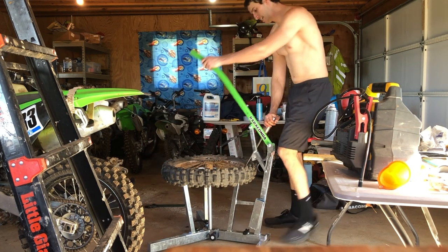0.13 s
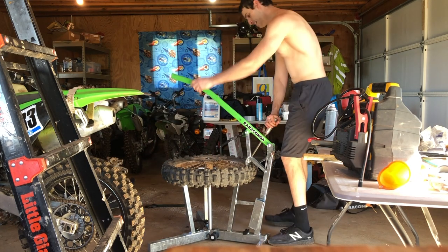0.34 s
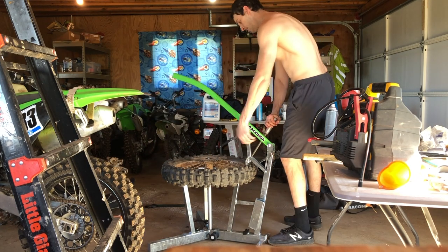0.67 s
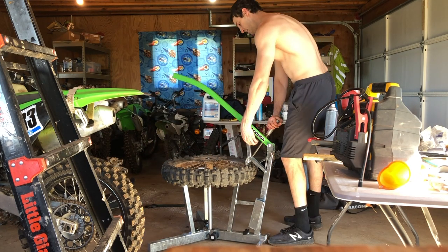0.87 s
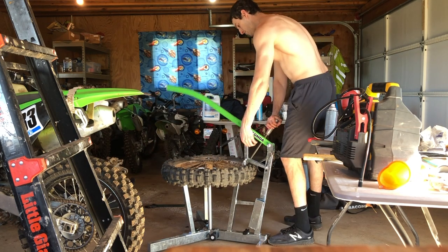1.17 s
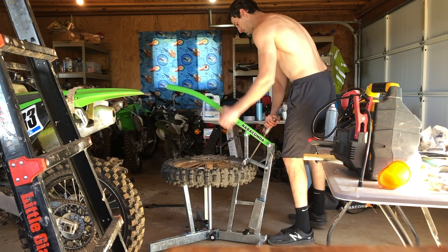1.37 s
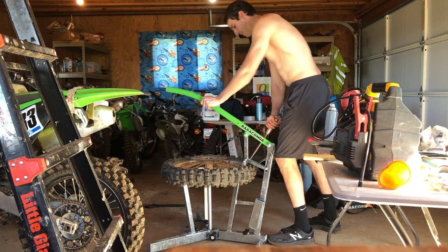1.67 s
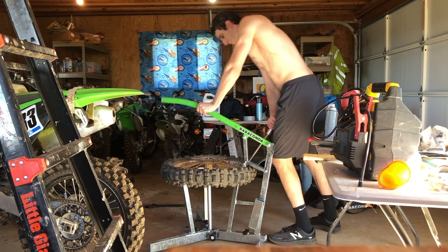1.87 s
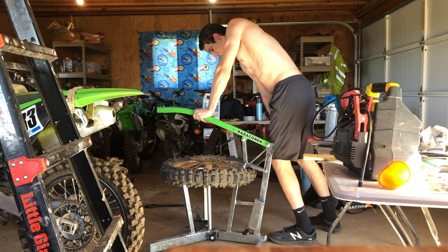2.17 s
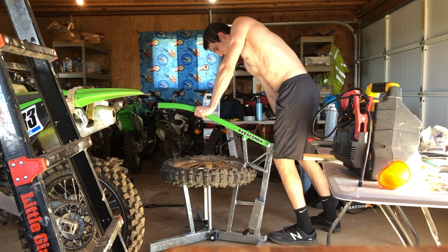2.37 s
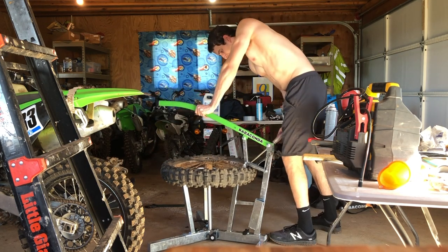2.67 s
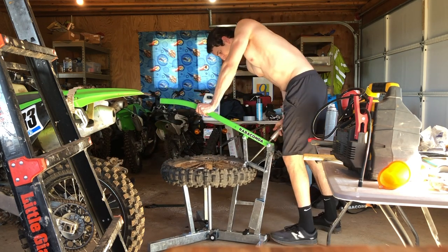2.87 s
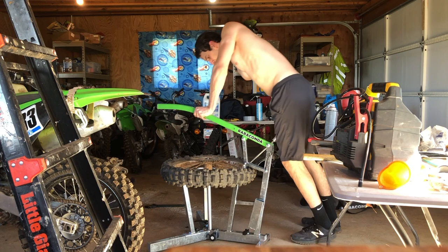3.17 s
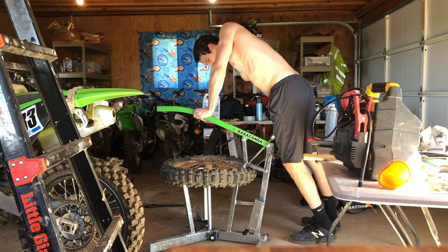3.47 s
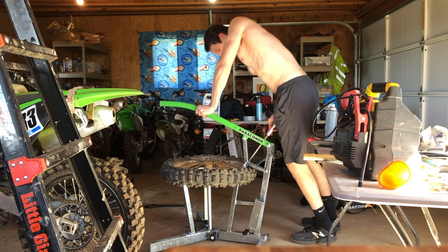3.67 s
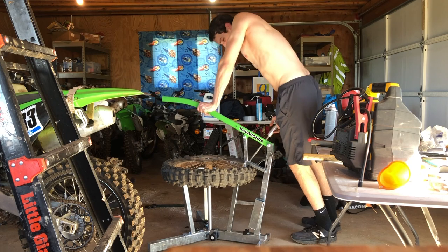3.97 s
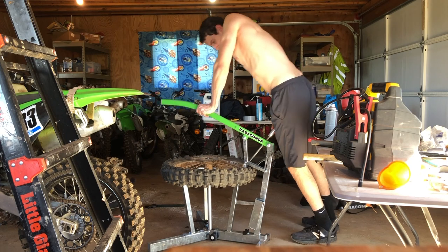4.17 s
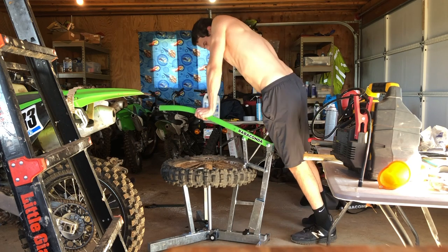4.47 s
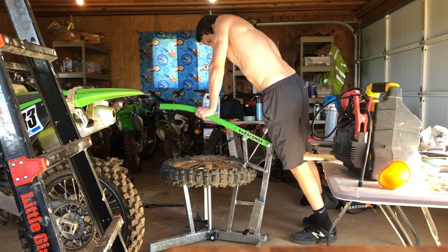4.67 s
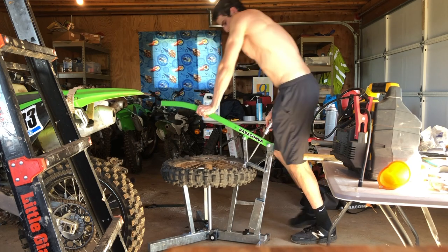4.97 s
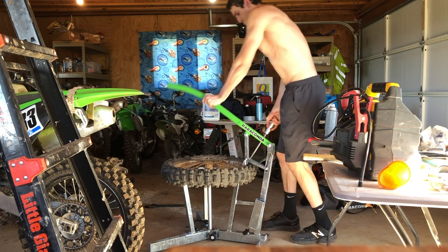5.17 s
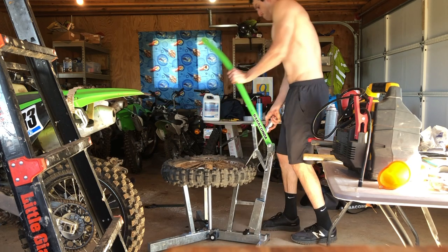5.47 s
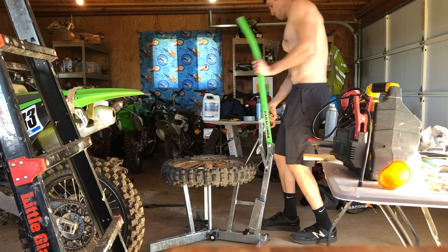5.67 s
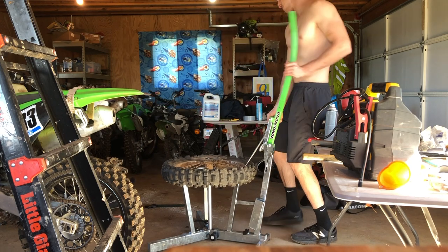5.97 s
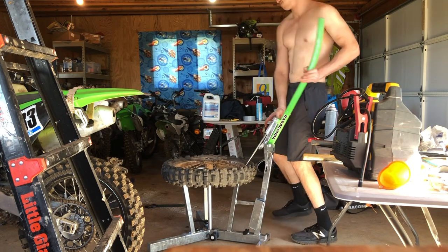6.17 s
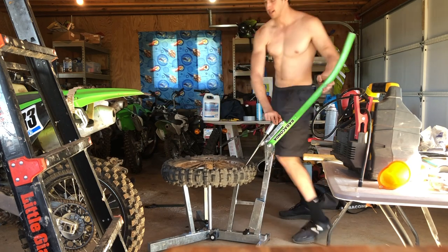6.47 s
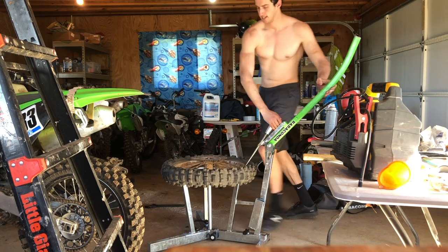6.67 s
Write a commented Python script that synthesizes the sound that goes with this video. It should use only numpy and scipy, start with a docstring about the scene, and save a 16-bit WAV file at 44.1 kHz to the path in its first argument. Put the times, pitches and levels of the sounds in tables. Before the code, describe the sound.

A steel lever clanks and rings in the stand of a hand tire changer, loudest near the start. The tool scrapes in small jerks while the tire thumps dully and its rubber squeaks and judders. Thin pings and snaps come from the strained wheel, then another loud clank leads into two chattering slides as the tool drags off. It is heard from a few steps away in an echoing garage with a steady hush.

```python
"""Scrapes, dull thumps and loud steel clanks: a tire is levered off its rim in a garage.
The tool scrapes in tiny jerks, the tire thumps as it flexes, and slipping rubber squeaks and judders.
The lever clanks in the steel stand of a hand tire changer, and both ring. The strained wheel pings;
the tool taps, snaps free and finally drags off the tire in two long slides.
A faint, breath-like hiss comes and goes. The bare room echoes all of this over a steady hush."""
import sys
import numpy as np
from scipy import signal
from scipy.fft import rfft, irfft, next_fast_len
from scipy.io import wavfile
from scipy.ndimage import uniform_filter1d

SR = 44100
rng = np.random.default_rng(int(sys.argv[2]) if len(sys.argv) > 2 else 0)


def waveform_to_disk(signal):
    """Save audio, clipped to [-1, 1], as 16-bit WAV at the path in sys.argv[1]."""
    frames = np.transpose(np.atleast_2d(signal))
    scaled = np.clip(frames, -1, 1) * 32767
    samples = np.round(scaled).astype(np.int16)
    wavfile.write(sys.argv[1], SR, samples)


N = 300762

# Below, "hardness" is how bright a contact sounds and "bite" is how much it rasps.
# A "ring time" (t60) is how long a sound takes to fade by 60 dB.
# The lever slams against its stop: (time [s], level [dB], contact decay [s], hardness [dB], bite [dB],
# level of the slack's rattle against the slam [dB], head start of that rattle [s])
SLAM_HITS = [(0.333, -21, 0.0094, 0, -2, -18.5, 0.018), (1.1856, -11, 0.0062, 6.5, 2.5, -27.5, 0.019),
             (5.0932, -20, 0.0096, 10.5, -4, -35, 0.0044), (5.8956, -25, 0.0077, -1.5, 2.5, -17, 0.014)]
# Tone colour of the steel: (frequency [Hz], level [dB])
STEEL_COLOUR = [(30, -54), (70, -31.5), (150, -15), (240, -15.5), (380, -10), (620, -3), (860, 0.5),
                (1100, 0.5), (1500, -5.5), (2500, -4.5), (4000, -6), (8000, -12), (11000, -17.5),
                (13000, -24.5), (16000, -27.5)]
# Tone colour that sliding adds: (frequency [Hz], level [dB])
RUB_COLOUR = [(40, -13), (90, -1.5), (250, 2.5), (900, -0.5), (2000, 3), (5000, 1.5), (12000, 0)]


def gain_of(db):
    """Turns decibels into a factor to multiply a sound by."""
    return 10 ** (np.asarray(db) / 20)


def evened(x):
    """Scales a signal to an average strength (rms) of 1."""
    return x / np.sqrt(np.mean(x ** 2) + 1e-20)


def read(points, hz):
    """Reads a curve of (frequency, value) points, with octaves evenly spaced."""
    point_hz, value = np.transpose(points)
    return np.interp(np.log(hz + 1), np.log(point_hz + 1), value)


def seconds(length):
    """The time of each sample in a sound of this length."""
    return np.arange(int(length * SR)) / SR


def add(mix, s, sound):
    """Mixes a sound in, starting at s seconds."""
    part = mix[max(round(s * SR), 0):][:len(sound)]
    part += sound[:len(part)]


def coloured(x, *curves, size=2048):
    """Shapes the tone by the sum of the dB curves; white noise would keep its strength."""
    hz = abs(np.fft.fftfreq(size, 1 / SR))
    log_gain = np.log(gain_of(sum(read(points, hz) for points in curves)))
    response = np.exp(signal.hilbert(log_gain).conj())  # nothing sounds ahead of its cause
    taps = np.fft.ifft(response).real[:size // 2]
    return signal.fftconvolve(x, taps / np.linalg.norm(taps))[:len(x)]


def contact(colour, hardness_db, bite_db=0):
    """Tone curves of one contact: hard edges are bright, padded ones dull, digging ones rasp."""
    # Brightness of a harder contact: (frequency [Hz], boost [dB per dB of hardness])
    harder = [(250, 0.18), (900, 0), (2000, 0.09), (5000, 0.53), (12000, 1)]
    # Rasp of an edge digging in: (frequency [Hz], boost [dB per dB of bite])
    biting = [(900, 0), (2100, 1), (3200, 0.96), (5500, 0.3), (11000, 0)]
    brightness = [(hz, hardness_db * share) for hz, share in harder]
    rasp = [(hz, bite_db * share) for hz, share in biting]
    return colour, brightness, rasp


def uneven(ripple_db=1.27, count=48):
    """A randomly bumpy tone curve: each point of contact favours different resonances."""
    hz = np.linspace(np.sqrt(400), np.sqrt(12000), count) ** 2
    return np.transpose([hz, ripple_db * rng.standard_normal(count)])


def swell(t, rise, length):
    """Loudness grows during the rise, then eases off to nothing."""
    return np.sin(np.pi / 2 * np.interp(t, [0, rise, length], [0, 1, 0])) ** 2


def grainy_noise(t, ticks_per_s=1500, smooth_db=-5, spread_db=0.5):
    """A swarm of tiny uneven ticks over smooth noise, like surfaces that stick and slip."""
    smooth, direction = rng.standard_normal((2, len(t)))
    sizes = gain_of(spread_db * np.minimum(rng.exponential(1, len(t)), 4))
    has_tick = rng.random(len(t)) < ticks_per_s / SR
    ticks = evened(np.sign(direction) * sizes * has_tick)
    return evened(ticks + gain_of(smooth_db) * smooth)


def partials(tones, t, detune=0., count=1):
    """Metal's own tones: count fading sines for each, off pitch by up to the share detune."""
    hz, db, t60 = np.repeat(np.array(tones, float), count, axis=0).T[:, :, None]
    hz = hz * (1 + detune * rng.uniform(-0.94, 1, hz.shape))
    sines = gain_of(db) * np.exp(-np.log(1000) * t / t60) * np.sin(2 * np.pi * hz * t)
    return sines / np.sqrt(np.sum(gain_of(db) ** 2) / 2)


def ring(sines):
    """Adds up the tones; the spot that is struck decides which way each one first swings."""
    return np.sign(rng.standard_normal(len(sines))) @ sines


def still_air(level_db=-64.5):
    """The faint steady hush of the garage."""
    # Tone colour of the hush: (frequency [Hz], level [dB])
    hush_colour = [(15, -35), (25, -13.5), (55, -6.5), (78, 0), (115, -5), (344, -4), (1070, -7.5),
                   (1480, -12), (2110, -15), (2690, -20), (3430, -17), (5000, -18), (10700, -26),
                   (14800, -26), (16000, -37)]
    size = next_fast_len(N, True)
    hz = np.fft.rfftfreq(size, 1 / SR)
    spectrum = rfft(rng.standard_normal(size)) * gain_of(read(hush_colour, hz))
    return gain_of(level_db) * evened(irfft(spectrum, size)[:N])


def scrapes_and_hisses():
    """Short bursts of grainy noise swell and ease off, heard as scrapes or soft hisses."""
    # Bursts: (time [s], rise [s], length [s], level [dB], hardness [dB], bite [dB])
    bursts = [(0.0, 0.0004, 0.055, -43.5, -2.5, 0.5), (0.127, 0.028, 0.042, -38.5, 0, -2),
              (0.174, 0.019, 0.12, -37, 2.5, 2.5), (0.489, 0.077, 0.21, -44, -3.5, -0.5),
              (0.828, 0.012, 0.096, -57.5, -8.5, -8), (0.986, 0.017, 0.1, -56.5, 1, -2.5),
              (1.201, 0.012, 0.046, -35.5, -2, -3), (1.359, 0.077, 0.2, -44, -3, -4),
              (1.441, 0.027, 0.12, -39, 14, 13.5), (1.806, 0.019, 0.18, -42, -4, -1.5),
              (1.968, 0.023, 0.076, -44.5, -9, -4), (2.409, 0.014, 0.046, -51.5, 9, -3),
              (2.843, 0.011, 0.12, -51.5, -8.5, -2), (3.052, 0.018, 0.17, -49, -3.5, 0),
              (3.66, 0.043, 0.12, -53.5, 1, -3.5), (4.098, 0.013, 0.21, -54.5, -5, -0.5),
              (4.356, 0.075, 0.26, -64.5, -6.5, 12), (4.815, 0.022, 0.16, -50.5, -2.5, 3),
              (4.922, 0.069, 0.23, -47.5, -11.5, -4), (5.101, 0.013, 0.18, -38, -5, 5),
              (5.37, 0.046, 0.61, -57, -4, -1), (5.9, 0.03, 0.087, -38, 3, -1.5),
              (6.434, 0.02, 0.26, -52.5, -0.5, -4), (6.623, 0.011, 0.55, -44.5, 5, 0.5),
              (6.689, 0.035, .15, -36, -7, 6)]
    out, t = np.zeros(N), seconds(.45)
    for s, rise, length, db, hardness_db, bite_db in bursts:
        noise = swell(t, rise, length) * grainy_noise(t)
        burst = coloured(noise, STEEL_COLOUR, uneven(), *contact(RUB_COLOUR, hardness_db, bite_db))
        add(out, s, gain_of(db) * burst)
    return out


def faint_hiss():
    """A faint, breath-like hiss that swells and fades."""
    # Loudness of the hiss: (time [s], level [dB])
    levels = [(0, -55.5), (.8, -66), (1.1, -59.5), (1.7, -73.5), (2.4, -64.5), (2.66, -81), (2.74, -59),
              (3.0, -74.5), (3.4, -72.5), (3.95, -73), (4.25, -68.5), (4.55, -57.5), (4.75, -81),
              (5.0, -65), (5.38, -65.5), (6.82, -56)]
    t = np.arange(N) / SR
    hiss = grainy_noise(t) * gain_of(np.interp(t, *np.transpose(levels)))
    return coloured(hiss, STEEL_COLOUR, *contact(RUB_COLOUR, hardness_db=-1, bite_db=4))


def gliding_peaks(noise, depth_db=1.8, peaks_per_octave=4, max_octaves_per_s=2.5, count=16):
    """Gentle peaks in the tone glide up and down, as when a contact travels along the rim."""
    hz, t, spectrum = signal.stft(noise, SR, nperseg=1024, noverlap=768)
    octave = np.log2(hz + 1)[:, None]
    ripple = 0
    for spacing, speed, start in rng.uniform(-1, 1, (count, 3)):
        gliding = octave + max_octaves_per_s * speed * t
        ripple += np.cos(2 * np.pi * (peaks_per_octave * (1 + spacing / 2) * gliding + start))
    gain = evened(gain_of(depth_db * evened(ripple)))
    return signal.istft(spectrum * gain, SR, nperseg=1024, noverlap=768)[1][:N]


def thumps(sag=0.092, puff_db=-5):
    """The tire and the stand's foot flex: a low, sagging note with a dull puff."""
    # Thumps on their own: (time [s], level [dB], pitch [Hz], length [s])
    flexes = [(0.0, -50.5, 158, 0.032), (0.208, -46.5, 168, 0.056), (1.376, -46, 247, 0.08),
              (2.388, -48.5, 154, 0.074), (3.584, -58, 249.6, 0.042), (3.725, -58.5, 295, 0.058),
              (5.145, -47, 147.5, 0.087), (5.513, -55.5, 165.4, 0.054), (5.671, -57.5, 156, 0.039),
              (5.92, -50.5, 148, 0.062), (6.134, -60.5, 279, 0.093), (6.336, -53.5, 298, 0.085),
              (6.738, -48, 180, 0.042)]
    # Every slam shakes the tire: (delay [s], level against the slam [dB], pitch [Hz], length [s])
    shakes = [(.006, -33.5, 150.3, 0.081), (.008, -33, 220, 0.064), (0.016, -40.5, 125, .06)]
    after_slams = [(s + delay, db + shake_db, hz, length)
                   for s, db, *_ in SLAM_HITS for delay, shake_db, hz, length in shakes]
    out = np.zeros(N)
    for s, db, hz, length in flexes + after_slams:
        t = seconds(length)
        note = np.sin(2 * np.pi * hz * t * (1 + sag * (1 - t / length)))
        band = signal.butter(2, [hz / 2, hz * 2], "band", fs=SR)
        puff = evened(signal.lfilter(*band, rng.standard_normal(len(t))))
        add(out, s, gain_of(db) * np.sin(np.pi * t / length) * (note + gain_of(puff_db) * puff))
    return out


def squeaks(jitter=0.02):
    """Where rubber or the pivot slips evenly, it squeaks in short wavering glides."""
    # Squeaks: (time [s], length [s], level [dB], start pitch [Hz], end pitch [Hz],
    # overtone an octave up against the main tone [dB])
    glides = [(0.008, 0.115, -53, 322, 369, -18), (0.021, .07, -49.5, 970, 1083, -20),
              (0.095, 0.035, -51, 625, 660, 4), (1.003, 0.059, -56, 1966, 2050, -1),
              (2.419, 0.02, -48.5, 2230, 5830, -9), (2.775, 0.072, -60.5, 1308, 1416, -19)]
    out = np.zeros(N)
    for s, length, db, start_hz, end_hz, octave_db in glides:
        progress = seconds(length) / length
        waver = evened(uniform_filter1d(rng.standard_normal(len(progress)), 150))
        hz = (start_hz + (end_hz - start_hz) * progress) * (1 + jitter * waver)
        phase = 2 * np.pi * np.cumsum(hz) / SR
        tone = np.sin(phase) + gain_of(octave_db) * np.sin(2 * phase)
        add(out, s, gain_of(db) * np.sin(np.pi * progress) * tone)
    return out


def blows(knock_decay_s=0.0043, slack_decay_s=0.022):
    """Lists the steel blows: a knock is one; a slam rattles its slack, catches an edge, then lands."""
    # Light knocks of lever and tool: (time [s], level [dB], hardness [dB], bite [dB])
    knocks = [(0.133, -36, -3, -12), (0.146, -31.5, -18, -2), (0.18, -34.5, -10, -4), (0.192, -28, -6, -4),
              (.327, -30, -3, -8), (1.324, -32.5, -2, 10), (1.7948, -36, -10, -3.5),
              (1.8125, -36.5, -11.5, -9), (2.004, -39, -16, -12), (2.882, -43.5, -12.5, -2),
              (3.062, -44, -32, -18), (3.6548, -34.5, -19, -6.5), (4.094, -47.5, -22, -6),
              (4.126, -48, -18, -1), (4.323, -51, -31, -15), (5.017, -44.5, 7, -8), (6.632, -39, -18, -7),
              (6.708, -40, -6, -1)]
    # A slam's catch and landing: (head start [s], level against the slam [dB], decay stretch [factor])
    stages = [(.0036, -10.5, 1), (0, 0.5, 0.91)]
    rows = [(s, db, knock_decay_s, hardness_db, bite_db) for s, db, hardness_db, bite_db in knocks]
    for s, db, decay, hardness_db, bite_db, slack_db, slack_s in SLAM_HITS:
        rows.append((s - slack_s, db + slack_db, slack_decay_s, hardness_db, bite_db))
        for lead, stage_db, stretch in stages:
            rows.append((s - lead, db + stage_db, decay * stretch, hardness_db, bite_db))
    return rows


def clanks(clatter_db=-19, clatter_t60=0.15, seat_s=0.00089, lever_db=-25, stand_db=-28.5):
    """Each blow cracks, makes the frame clatter, and sets the lever and its stand ringing."""
    # Tones of the lever: (pitch [Hz], level [dB], ring time [s])
    lever_tones = [(2803, -1, .3), (2985, -3, .28), (3591, -1, .3), (3950, 4, .25), (4165, 3, .25),
                   (4208, 0, .25), (5175, 0, .35), (5383, 4, .35), (5719, 1, .3), (5857, 0, .3),
                   (6439, 1, .25), (6912, 0, .25), (7431, -1, .25), (9175, -2, .2)]
    # Tones of the stand: (pitch [Hz], level [dB], ring time [s])
    stand_tones = [(725, -8, .15), (880, -5, .15), (954, 3, .22), (1160, -1, .18), (1250, -3, .18),
                   (1553, -2, .2), (1810, -1, .22), (2025, -1, .22), (2210, 1, .22), (2466, 0, .25)]
    # Tone colour that striking adds: (frequency [Hz], level [dB])
    blow_colour = [(250, -1.5), (620, -5), (900, -3), (2000, 4), (3000, 5.5), (5000, 6.5), (12000, 7.5)]
    out, ring_t = np.zeros(N), seconds(.45)
    t = ring_t[:len(ring_t) // 2]
    clatter = gain_of(clatter_db) * np.exp(-np.log(1000) * t / clatter_t60)
    seating = 1 - np.exp(-t / seat_s)  # loose joints take a moment to close
    for s, db, decay, hardness_db, bite_db in blows():
        # the changing load shifts the tones from blow to blow
        lever = partials(lever_tones, ring_t, detune=.0015)
        stand = partials(stand_tones, ring_t, detune=.012)
        burst = seating * (np.exp(-t / decay) + clatter) * rng.standard_normal(len(t))
        crack = coloured(burst, STEEL_COLOUR, uneven(), *contact(blow_colour, hardness_db, bite_db))
        lever_gain = gain_of(lever_db + .3 * hardness_db)  # harder blows ring the lever more
        add(out, s, gain_of(db) * crack)
        add(out, s, gain_of(db) * (lever_gain * ring(lever) + gain_of(stand_db) * ring(stand)))
    return out


def judders(rise_share=0.18):
    """The tire's edge slips unevenly over the rim: a rough note that glides as the rubber stretches."""
    # Judders: (time [s], length [s], level [dB], pitch [Hz], fall [share of pitch; below 0 it rises],
    # width of the noise band [share of pitch])
    rough_notes = [(0.564, 0.076, -43.5, 1112, 0.032, 0.43), (0.829, 0.028, -56, 1580, 0.1, 0.34),
                   (1.135, 0.098, -52.5, 1255, 0.03, 1), (1.196, 0.041, -36.5, 1008, 0.13, 0.26),
                   (1.43, 0.078, -41.5, 976, 0.041, 0.13), (1.455, 0.0425, -33.5, 1551, -0.25, 0.4),
                   (2.675, 0.029, -63, 893, -0.049, 0.36), (2.706, 0.037, -64, 1490, -0.11, 0.31),
                   (2.877, 0.011, -48, 1068, 0.071, 1), (3.063, 0.031, -44.5, 802, 0.16, 0.76),
                   (3.094, 0.027, -47, 595, 0.11, 0.8), (3.133, 0.021, -54.5, 860, 0.16, 0.52),
                   (3.577, 0.036, -52, 750, 0.23, 0.48), (3.78, 0.042, -48, 2710, 0.044, 0.49),
                   (3.784, 0.047, -50.5, 899, .1, 0.91), (4.64, 0.07, -63, 718, 0.1, 0.31),
                   (5.083, 0.045, -34, 1281, -0.0011, .55), (5.11, 0.051, -34.5, 938, 0.34, 0.56),
                   (5.133, 0.052, -36.5, 2156, 0.093, 0.28), (5.493, 0.11, -55, 1014, .15, 0.2),
                   (6.138, 0.15, -51.5, 1013, -.35, 0.37), (6.276, 0.048, -43, 1560, -0.21, 0.23),
                   (6.33, 0.088, -51.5, 599.4, 0.42, 1), (6.402, 0.046, -45, 1334, 0.03, .35),
                   (6.44, 0.065, -49.5, 1017, 0.24, 0.48), (6.736, 0.06, -45.5, 361, 0.11, 0.66),
                   (6.731, 0.066, -42.5, 1041, 0.34, .8)]
    out = np.zeros(N)
    for s, length, db, hz, fall, width in rough_notes:
        t = seconds(length)
        jerks = rng.standard_normal(len(t)) + 1j * rng.standard_normal(len(t))
        sway = signal.lfilter(*signal.butter(2, width * hz / 2, fs=SR), jerks)
        gliding_hz = hz * (1 + fall * (.5 - t / length))
        tone = np.exp(2j * np.pi * np.cumsum(gliding_hz) / SR)
        add(out, s, gain_of(db) * swell(t, rise_share * length, length) * evened((sway * tone).real))
    return out


def clinks():
    """The tip of the tool taps the rim and rings briefly."""
    # Taps: (time [s], level [dB])
    taps = [(0.9443, -44.5)]
    # Tones of the tip: (pitch [Hz], level [dB], ring time [s])
    tip_tones = [(975, -5.5, .1), (2350, -5.5, .07), (2537, -1, .05), (2966, -6, .06)]
    out, tip = np.zeros(N), partials(tip_tones, seconds(.25))
    for s, db in taps:
        add(out, s, gain_of(db) * ring(tip))
    return out


def wheel_pings(crack_s=0.0069, crack_db=5.5, ring_db=-8):
    """The wheel's strained metal lets go in thin dry pings: a crack and a high ring."""
    # Pings: (time [s], level [dB], treble tilt [dB per octave])
    pings = [(1.127, -61, -6), (2.0698, -42, 2.5), (2.3166, -40, 2.5), (2.567, -44, 0.5),
             (3.549, -51.5, -2), (5.5954, -44.5, 0), (5.863, -35, 10), (6.085, -38, 7.5)]
    # Tones of the wheel: (pitch [Hz], level [dB], ring time [s])
    wheel_tones = [(3080, -5, 0.16), (5200, -2.5, 0.08), (6100, 3, 0.05), (6440, 0, .12),
                   (6900, -4.5, 0.12), (8800, 3.5, 0.13), (11400, -4.5, .08), (14500, -7, 0.16),
                   (15480, -3, 0.11)]
    # Tone colour of the crack: (frequency [Hz], level [dB])
    crack_colour = [(500, -37), (2300, -28), (3000, -2.5), (4400, -5), (5800, 8), (7500, -1), (8700, 0),
                    (12500, -17.5), (15000, -6)]
    out, t = np.zeros(N), seconds(.35)
    for s, db, tilt_db in pings:
        wheel = partials(wheel_tones, t, detune=0.012, count=5)
        crack = coloured(np.exp(-t / crack_s) * rng.standard_normal(len(t)), crack_colour)
        ping = gain_of(crack_db) * crack + gain_of(ring_db) * ring(wheel)
        tilt = [(4000, -tilt_db), (16000, tilt_db)]
        add(out, s, gain_of(db) * coloured(ping, tilt))
    return out


def snaps(decay_s=0.0019):
    """The tool sticks and snaps free, muffled by the rubber; a quick run of snaps creaks."""
    # Moments of letting go: (time [s], level [dB], hardness [dB])
    releases = [(2.025, -31, 3), (3.7818, -40, -6), (3.789, -45, -7), (3.9932, -46, -13),
                (5.4339, -35.5, 1), (5.456, -40.5, 2), (5.495, -34, 4), (6.2692, -28.5, -12),
                (6.3044, -45, -4), (6.4032, -29, -3), (6.4154, -30.5, 1), (6.428, -28.5, -1),
                (6.44, -35.5, -1), (6.457, -36, -7)]
    # Tone colour of the tool pressed on the rim: (frequency [Hz], level [dB])
    snap_colour = [(200, -24.5), (700, -10.5), (1000, 2), (1350, 0.5), (1850, -4), (2300, -2.5),
                   (2750, -2.5), (3300, -4), (4000, -10.5), (7000, -17), (15000, -30.5)]
    out, t = np.zeros(N), seconds(.05)
    for s, db, hardness_db in releases:
        snap = np.exp(-t / decay_s) * rng.choice([-1., 1.], len(t))
        add(out, s, gain_of(db) * coloured(snap, *contact(snap_colour, hardness_db)))
    return out


def rim_knock(crack_s=0.0069, crack_db=-7):
    """The tool slips and knocks on the rim, which rings in clusters of close tones."""
    # The knock: (time [s], level [dB])
    knocks = [(2.201, -36)]
    # Tones of the rim: (pitch [Hz], level [dB], ring time [s])
    rim_tones = [(550, -2, 0.079), (1094, 1, 0.058), (1290, -5.5, 0.034), (2580, -10, 0.15),
                 (3330, -5, 0.062), (3570, -3, 0.15), (4700, -4, 0.075), (5100, -7, .035), (6600, -9, 0.1),
                 (7200, -12, 0.11), (8020, -16, .08), (11200, -18, .08)]
    out, t = np.zeros(N), seconds(.35)
    rim = partials(rim_tones, t, detune=0.042, count=12)
    for s, db in knocks:
        crack = coloured(np.exp(-t / crack_s) * rng.standard_normal(len(t)), STEEL_COLOUR)
        add(out, s, gain_of(db) * (gain_of(crack_db) * crack + ring(rim)))
    return out


def swing_back(trim_db=-3, chatter_db=1.7, chatter_s=.008):
    """As the lever swings back, the tool drags off the tire in two long chattering slides."""
    # One list of points for each slide: (time [s], level [dB], hardness [dB])
    slides = [
        [(5.605, -55, 19), (5.639, -51.5, 15), (5.727, -46.5, 10), (5.858, -44, -4)],
        [(6.04, -52.5, 13), (6.125, -43, 7), (6.29, -47.5, -4), (6.39, -62, -22)],
    ]
    out = np.zeros(N)
    for slide in slides:
        times, db, hardnesses = np.transpose(slide)
        t = times[0] + seconds(times[-1] - times[0])
        chatter = evened(uniform_filter1d(rng.standard_normal(N), int(chatter_s * SR)))[:len(t)]
        rub = grainy_noise(t) * gain_of(trim_db + np.interp(t, times, db) + chatter_db * chatter)
        for share, hardness_db in zip(np.eye(len(times)), hardnesses):
            fade = np.interp(t, times, share)  # each point's colour blends into the next
            add(out, times[0], fade * coloured(rub, STEEL_COLOUR, *contact(RUB_COLOUR, hardness_db)))
    return out


def early_echoes(x, cutoff_hz=3500):
    """The first single echoes; cluttered surfaces scatter their treble away."""
    # Echoes from floor, ceiling, bench and door: (delay [s], level [dB])
    echoes = [(.0021, -24.5), (.0047, -20.5), (.0083, -21.5), (0.0133, -25.5)]
    out, dull = np.zeros(N), signal.lfilter(*signal.butter(1, cutoff_hz, fs=SR), x)
    for s, db in echoes:
        add(out, s, gain_of(db) * dull)
    return out


def reflections(build_s=0.0098, echoes_per_s=5000):
    """The room's answer to one click: dense echoes build up quickly and fade band by band."""
    # How long the garage rings: (frequency [Hz], ring time [s])
    ring_times = [(120, 0.5), (400, 0.5), (1000, 0.54), (3000, 0.43), (6000, 0.3859), (10000, 0.3),
                  (16000, 0.42)]
    # Strength of its echo: (frequency [Hz], level against the direct sound [dB])
    echo_levels = [(120, 6), (900, 0), (3000, -2.5), (7000, -2), (15000, -6.5)]
    t = seconds(0.77)
    echoes = rng.choice([-1., 1.], len(t)) * (rng.random(len(t)) < echoes_per_s / SR)
    build_up = 1 - np.exp(-(t / build_s) ** 2)
    hz, age, spectrum = signal.stft(echoes * build_up, SR, nperseg=256)
    t60 = read(ring_times, hz)[:, None]
    fading = spectrum * np.exp(-np.log(1000) * age / t60) / np.sqrt(t60)
    tail = signal.istft(fading, SR, nperseg=256)[1]
    scale = gain_of(read(echo_levels, hz))[:, None] / np.linalg.norm(tail)
    return signal.istft(fading * scale, SR, nperseg=256)[1]


def garage(x, blend_s=1.7, count=3):
    """The garage's echo, blended from several patterns so that no single tone stands out."""
    blend = np.arange(N) / SR / blend_s
    shares = [np.sqrt(2 / count) * np.cos(np.pi * (blend + k / count)) for k in range(count)]
    return sum(signal.fftconvolve(x * share, reflections())[:N] for share in shares)


def scene(thump_room_db=-14):
    """The tire changer a few steps away, its echoes and the hush, in one channel."""
    hits = clanks() + snaps() + clinks()
    noises = gliding_peaks(scrapes_and_hisses() + swing_back() + faint_hiss())
    work = hits + noises + wheel_pings() + rim_knock() + judders() + squeaks()
    thumping = thumps()
    room = early_echoes(work) + garage(work + gain_of(thump_room_db) * thumping)
    return (work + thumping + room + still_air())[None]


def record(dry, low_cut_hz=42, high_cut_hz=16100):
    """Trims away the deepest rumble and the highest treble."""
    without_rumble = signal.lfilter(*signal.butter(3, low_cut_hz, "high", fs=SR), dry)
    treble_cut = signal.firwin(401, high_cut_hz, window=("kaiser", 9), fs=SR)
    return signal.oaconvolve(without_rumble, treble_cut[None], "same")


dry = scene()
out = record(dry)
waveform_to_disk(out)
```